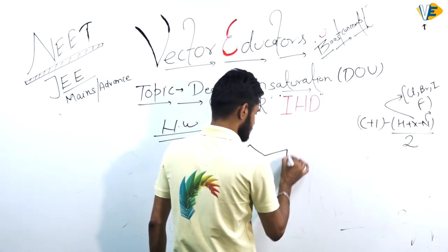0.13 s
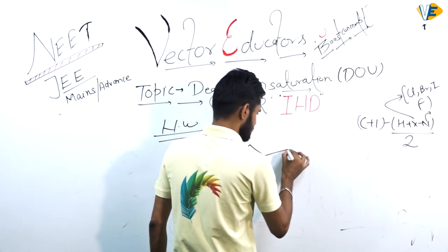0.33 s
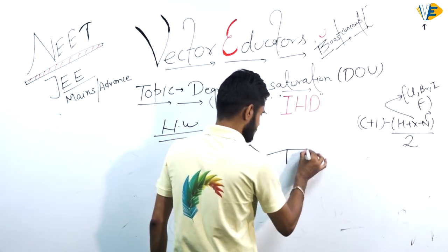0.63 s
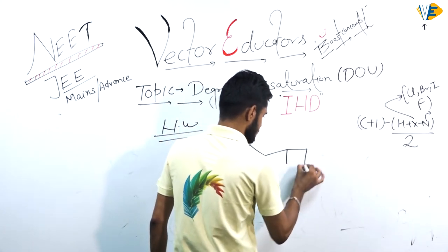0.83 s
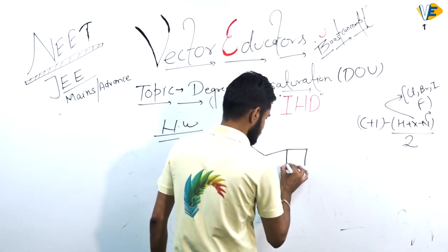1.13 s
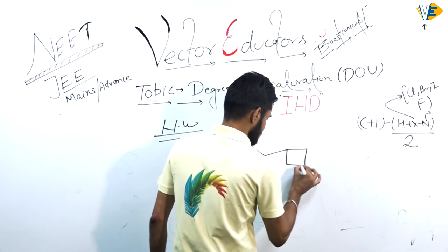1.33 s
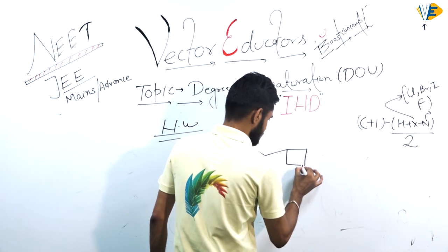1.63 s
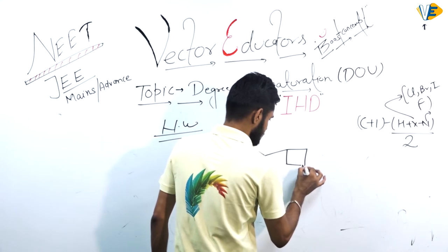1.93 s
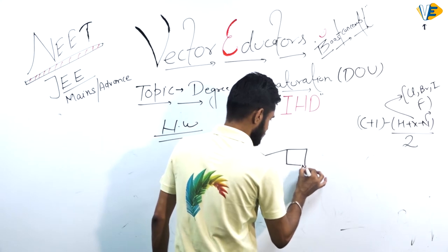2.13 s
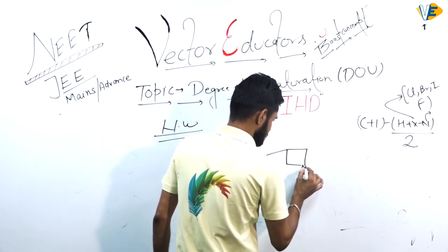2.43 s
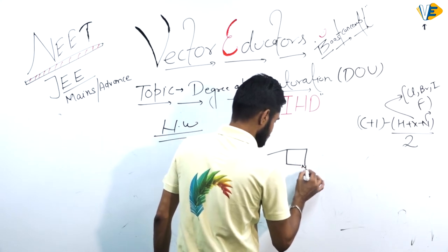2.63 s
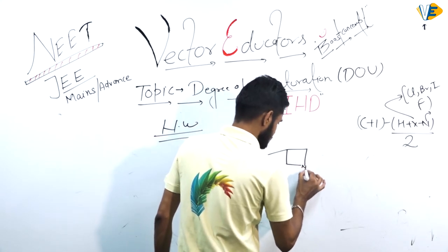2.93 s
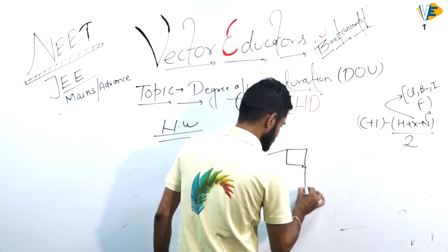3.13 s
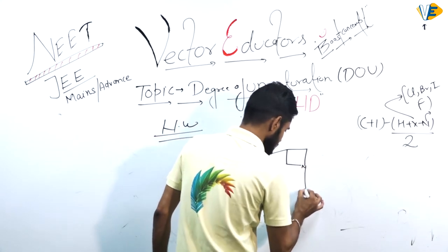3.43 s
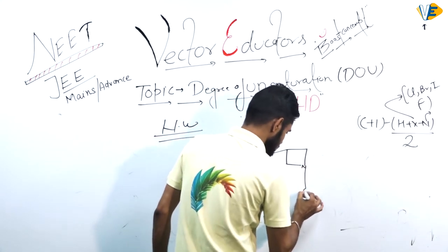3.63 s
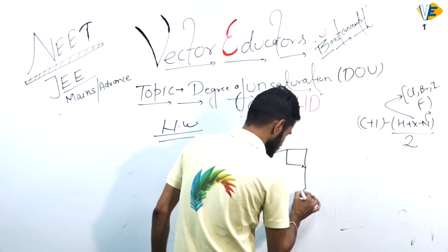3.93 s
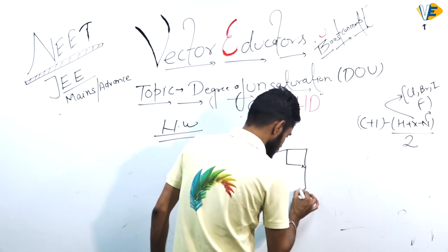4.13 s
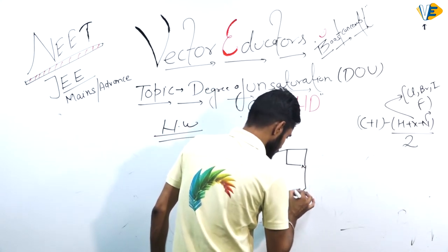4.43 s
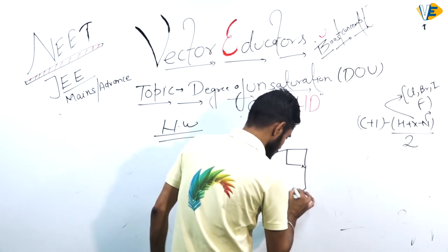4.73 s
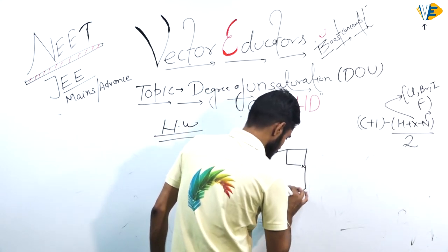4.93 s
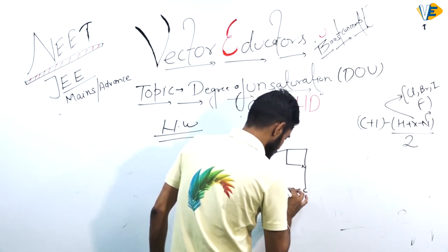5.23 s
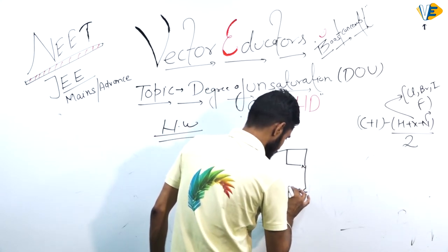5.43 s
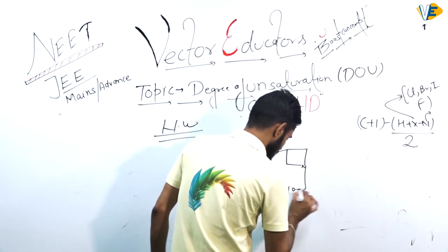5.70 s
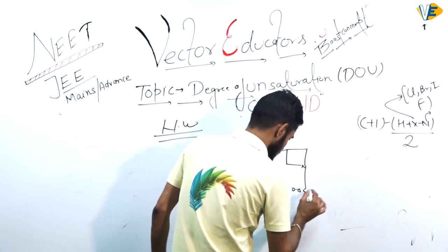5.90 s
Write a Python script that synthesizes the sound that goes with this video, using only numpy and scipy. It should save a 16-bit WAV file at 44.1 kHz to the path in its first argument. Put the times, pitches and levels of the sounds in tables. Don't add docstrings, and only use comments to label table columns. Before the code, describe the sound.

A felt-tip marker draws on a whiteboard in a quiet room. Brief, piercing squeaks, some rising and some falling, turn rough and croaky for an instant. Soft low taps land before many strokes, with thin hiss as the felt slides. Clusters come early, around two seconds, then near three and from four to five and a half, with pauses between. A close small microphone catches short echoes and faint room noise.

```python
import sys
import numpy as np
from scipy import signal
from scipy.fft import rfft, irfft
from scipy.io import wavfile

SR = 44100
rng = np.random.default_rng(int(sys.argv[2]) if len(sys.argv) > 2 else 0)


def waveform_to_disk(signal):
    frames = np.transpose(np.atleast_2d(signal))
    scaled = np.clip(frames, -1, 1) * 32767
    samples = np.round(scaled).astype(np.int16)
    wavfile.write(sys.argv[1], SR, samples)


def invert_db(x):
    u = np.asarray(x, float) / 20
    return 10 ** u


N = 267422

# start t/s, end t/s, build-up time/s, half-rate lines level/dB, their tilt/dB per line
ALTERNATIONS = [(0.03, 0.05, 0.0038, -1.5, 0.5), (0.542, 0.58, 0.0048, -4, -1.5),
                (0.636, 0.654, 0.0027, -9.5, 3.5), (1.322, 1.36, .002, -15, -2.5),
                (1.573, 1.575, 0.0014, -8, -2.5), (1.5853, 1.5928, 0.0024, -4.5, -0.1),
                (1.819, 1.835, 0.0018, -4, -0.16), (2.043, 2.01, 0.0017, -13, 4.5),
                (3.14, 3.152, 0.0033, -3, -2.5), (3.41, 3.445, 0.002, -6, 1.5),
                (3.527, 3.565, 0.008, 4.5, 0.1), (4.26, 4.267, 0.0022, 6.5, 4),
                (4.554, 4.567, 0.0018, -14.5, 1), (4.562, 4.587, 0.0063, -1.5, 1.1),
                (4.665, 4.722, 0.003, 2, 2.75), (5.328, 5.323, 0.0021, -12, 4)]


def on_log(hz, table):
    f, v = np.transpose(table)
    return np.interp(np.log(np.maximum(hz, 1)), np.log(f), v)


def band(x, hz, width_hz):
    return signal.lfilter(*signal.iirpeak(hz, hz / width_hz, fs=SR), x)


def wander(n, rate):
    x = signal.lfilter(*signal.butter(2, rate, fs=SR), rng.standard_normal(n + 6000))
    return x[-n:] / x.std()


def ring(hz, t60, t):
    return np.sin(2 * np.pi * hz * t) * np.exp(-np.log(1000) * t / t60)


def add(out, s, x):
    i = int(round(s * SR))
    out[i:i + len(x)] += x[:N - i]


def alternation(t):
    even_db, settle_s = -43.5, 0.0032
    start, end, build, db, tilt_db = np.transpose(ALTERNATIONS)[..., None]
    on = np.clip(np.minimum((t - start) / build, (end - t) / settle_s) + .5, 0, 1)
    half_db = even_db + (on * (db - even_db)).max(axis=0)
    return on.max(axis=0), half_db, (on * tilt_db).sum(axis=0)


def lowest_db(t):
    # level/dB, level/dB, dealt out one by one to all start
    lowest = [(0.6, 6), (2.4, 1), (-1, 3.3), (-0.5, -2), (0.5, -4.7), (1, -1), (-0.7, 4.5), (0.5, -1.5),
              (-1, 0), (1, -6.5), (-27.5, 7), (-4, -7), (-9.5, 0), (1.5, -18), (-4.5, 6.5), (6, -6)]
    times = np.sort(np.array(ALTERNATIONS)[:, :2].ravel())
    return np.interp(t, times, np.ravel(lowest))


def squeak(rows, tilt_db, first_db, top_db, roll_tilt_db=0, roll_first_db=0, third_db=0, slope_db=0):
    # f/Hz, level/dB
    barrel = [(1500, -1.5), (3000, -6), (4500, -0.5), (6000, 4), (7500, -7), (8700, -5), (9400, -12),
              (10000, -19.5), (11500, -14.5), (13000, -22), (14000, -32), (15500, -44)]
    s, *columns = np.transpose(rows)
    t = np.arange(s[0], s[-1], 1 / SR)
    hz, level_db = (np.interp(t, s, c) for c in columns)
    on, half_db, half_tilt_db = alternation(t)

    along = (t - s[0]) / (s[-1] - s[0]) - .5
    tilt_db = tilt_db + roll_tilt_db * along
    first_db = first_db + roll_first_db * along

    jitter, chatter, slow_hz = .005, .36, 2950
    slowness = np.clip(1 - hz / slow_hz, 0, 1)
    uneven = jitter + chatter * slowness * (.06 + invert_db(np.minimum(half_db, 0)))
    turn = np.pi * np.cumsum(hz * (1 + uneven * wander(len(t), 1500))) / SR

    k = np.arange(1, 12)[:, None]
    line_hz = k * hz / 2
    colour_db = on_log(line_hz, barrel) + k * np.where(k % 2, half_tilt_db, tilt_db)
    size = invert_db(colour_db) * (line_hz < .36 * SR)
    size[0::2] *= invert_db(np.minimum(half_db, 9)) / np.linalg.norm(size[2:7:2], axis=0)
    rate_khz = (hz - hz.mean()) / 1000
    size[5] *= invert_db(third_db + slope_db * 3 * rate_khz)
    size[1::2] /= np.linalg.norm(size[3:8:2], axis=0)

    reference_db, lag, loss_db = -35.5, 0.77, -1.5
    db_per_khz, swell_db, fade_s = 1.5, 2.5, 0.002
    size[1] = invert_db(first_db - lag * (level_db - reference_db) + loss_db * on
                  + db_per_khz * rate_khz + swell_db * wander(len(t), 55))
    size[1] *= np.clip(np.minimum(2 * (t - s[0]), s[-1] - t) / fade_s, 0, 1)
    size[0] *= invert_db(lowest_db(t))
    size[7:] *= invert_db(top_db + .3 * (level_db - level_db.max()))
    size *= invert_db([1.1 * wander(len(t), 45) for _ in k])
    lines = size * np.sin(k * turn + rng.uniform(0, 2 * np.pi, k.shape))

    attack_s, release_s = 0.00036, 0.0011
    edge = np.clip(np.minimum((t - s[0]) / attack_s, (s[-1] - t) / release_s), 0, 1)
    flutter_db = (.2 + 35 * uneven) * wander(len(t), 400)
    return np.sqrt(2) * invert_db(level_db + flutter_db) * edge * lines.sum(axis=0)


def squeaks(pen):
    # t/s, slip rate f/Hz, level/dB
    first_sides = [
        [(0.0, 3330, -27.5), (0.012, 3275, -34), (0.022, 3120, -30.5), (0.0315, 2650, -48), (0.0325, 3070, -40),
         (0.035, 3160, -37.5), (0.039, 2870, -45), (0.042, 2840, -69)],
        [(0.361, 2600, -42), (0.363, 2900, -37.5), (0.368, 3150, -41.5), (0.374, 3320, -55), (0.385, 3365, -58)],
        [(0.526, 3000, -74.5), (0.531, 2996, -43), (0.543, 2820, -44), (0.546, 2960, -40.5), (0.552, 2940, -40),
         (0.557, 2770, -41.5), (0.563, 2400, -57.5)],
        [(0.645, 3290, -29.5), (0.65, 3580, -41), (0.653, 3400, -24), (0.656, 2950, -37), (0.661, 3380, -28),
         (0.669, 3420, -31), (0.68, 3610, -38), (0.708, 3670, -51.5), (0.715, 3640, -72), (0.733, 3660, -82)],
        [(0.778, 3480, -80), (0.785, 3540, -50), (0.788, 3473, -32), (0.815, 3404, -33), (0.824, 3360, -31),
         (0.84, 3180, -35.5), (0.853, 3060, -48.5), (0.857, 3000, -71.5)],
        [(1.142, 2856, -48.5), (1.16, 2834, -43.5), (1.187, 3094, -44), (1.223, 3316, -44), (1.228, 3240, -69)],
        [(1.301, 3120, -43), (1.311, 3014, -35.5), (1.3215, 2587, -45), (1.3228, 3010, -39.5),
         (1.329, 2560, -43), (1.333, 2660, -68)],
    ]
    # t/s, slip rate f/Hz, level/dB
    last_sides = [
        [(1.5745, 2990, -30.5), (1.581, 2820, -27.5), (1.5848, 2500, -32.5), (1.5865, 3404, -30.5),
         (1.5912, 3360, -30), (1.5922, 3126, -29.5), (1.601, 2814, -35.5), (1.608, 3132, -29),
         (1.652, 3213, -58)],
        [(1.82, 3150, -40.5), (1.823, 3260, -32), (1.828, 3386, -31), (1.8345, 3330, -36.5),
         (1.8352, 2860, -30.5), (1.84, 3156, -35.5), (1.86, 3177, -37.5), (1.879, 3287, -41.5),
         (1.898, 3260, -65)],
        [(2.0415, 2750, -33), (2.046, 2954, -31.5), (2.053, 2780, -29.5), (2.0575, 2920, -33),
         (2.061, 3254, -25), (2.07, 3170, -28.5), (2.08, 3276, -30.5), (2.088, 3374, -36.5), (2.097, 3330, -65)],
    ]
    # t/s, slip rate f/Hz, level/dB
    stem = [
        [(2.93, 3150, -29), (2.933, 3390, -40), (2.947, 3706, -30.5), (2.962, 3870, -47), (2.972, 3870, -70)],
        [(3.08, 3580, -52), (3.087, 3324, -42), (3.122, 3210, -37), (3.136, 2976, -32.5), (3.141, 2730, -43.5),
         (3.143, 2886, -40), (3.147, 2930, -42), (3.154, 2550, -48)],
        [(3.4147, 2894, -36), (3.422, 2823, -36.5), (3.4285, 2410, -43)],
        [(3.483, 3300, -45.5), (3.49, 3220, -49), (3.496, 2944, -32.5), (3.503, 2943, -32.5),
         (3.509, 2742, -31), (3.519, 2833, -27.5), (3.535, 3117, -36.5), (3.55, 3050, -44), (3.572, 2987, -63)],
        [(4.189, 3270, -41), (4.192, 3334, -47), (4.206, 3310, -47), (4.222, 3440, -49), (4.245, 3280, -37),
         (4.2585, 2750, -41), (4.2595, 2920, -41), (4.265, 2660, -47), (4.268, 2600, -57)],
    ]
    # t/s, slip rate f/Hz, level/dB
    letters = [
        [(4.55, 3080, -36), (4.553, 3030, -39.5), (4.559, 3120, -38), (4.5685, 2400, -46.5),
         (4.577, 2880, -41.5), (4.581, 3050, -43), (4.585, 3150, -57)],
        [(4.6325, 3280, -40.5), (4.642, 3320, -40), (4.648, 3140, -34.5), (4.657, 2790, -30),
         (4.662, 2740, -33.5), (4.6645, 2660, -32), (4.667, 2530, -38)],
        [(4.667, 3040, -37.5), (4.676, 3020, -35), (4.683, 3127, -35.5), (4.692, 3063, -41.5),
         (4.701, 2970, -37), (4.71, 3000, -39.5), (4.714, 3050, -40), (4.716, 3305, -53), (4.72, 3330, -53)],
        [(5.0647, 2644, -28.5), (5.068, 3380, -31.5), (5.0715, 3417, -30.5), (5.077, 3247, -30),
         (5.082, 3415, -30), (5.086, 3570, -42.5), (5.11, 3495, -54.5), (5.124, 3420, -64)],
        [(5.121, 3430, -47), (5.126, 3404, -41), (5.142, 3305, -43), (5.156, 3280, -80)],
        [(5.32, 2730, -28), (5.326, 3150, -30), (5.341, 2862, -28), (5.355, 2808, -30.5), (5.366, 3074, -35.5),
         (5.385, 3180, -71.5)],
        [(5.5, 2860, -35), (5.503, 3850, -27), (5.5055, 4180, -63), (5.51, 4000, -60)],
    ]
    # stack tilt/dB per line, fundamental level/dB at reference, top lines level/dB
    grips = [(-1.5, -12, 6), (4.5, -13.5, -2), (0, -16.5, -5), (-2, -8, 0), (-4, -9, 7), (5, -15, -29),
             (-0.5, -15, 0.5), (2, -16, -9.5), (0, -17.5, 2), (0, -13, -2), (1, -4.5, 6), (1.5, -6, 0),
             (1, -12.5, -8.5), (2, -10, -3.5), (3, -12, -10), (0, -15, -5.5), (1.5, -10.5, -3.5),
             (1.5, -11, -2.5), (1.9, -4, 1.5), (4.5, -12, -21), (1, -9.5, -1.5), (1.7, -1, 0)]
    # tilt/dB per line, fundamental/dB; third harmonic/dB throughout
    rolls = [(-0.5, -13, -4), (14.5, 8, 4.5), (-2, 1.2, -0.2), (0.3, 4.5, -5), (2, -12.5, -0.8),
             (7.5, 6, 0), (8, -6, 1), (-2, -3, -5), (4.5, 2.5, -0.5), (-6, 10, -5.5), (2.5, 9.5, -3),
             (-0.5, -2, -0.2), (10, 5, -4.5), (-1, -0.5, 1), (-7, -1, 3.3), (2, -11, -2.5), (-3.5, 6, 0.5),
             (4, 18, -4), (4.3, 8.5, -0.6), (.2, -8.5, -0.3), (-0.3, -2.5, 1), (4, 18, -1.2)]
    third_slopes = [-1, 2, .3, -5, 2, 3, 6, -12.5, -5, -12, .3, 3, -7, 11.5, -1.3, -9, 2.3, 4, -0.8, -2,
                    7.5, 1]
    curves = first_sides + last_sides + stem + letters
    for rows, grip, roll, slope_db in zip(curves, grips, rolls, third_slopes):
        add(pen, rows[0][0], squeak(rows, *grip, *roll, slope_db))


def chirp(s, length, first_hz, last_hz, db):
    shape = ((0, -2.5), (0.58, 0), (1, -11))
    return [(s + u * length, first_hz + u * (last_hz - first_hz), db + drop_db) for u, drop_db in shape]


def catches(pen):
    # t/s, length/s, first rate f/Hz, last rate f/Hz, peak level/dB
    brief_catches = [
        (0.3094, 0.0039, 2830, 2770, -44),
        (3.4369, 0.0067, 2770, 3370, -41),
        (4.122, 0.0074, 3220, 3430, -56.5),
        (4.145, 0.011, 3380, 3380, -61),
        (4.722, 0.015, 3210, 3390, -46),
        (5.45, 0.006, 3150, 2440, -42.5),
    ]
    for catch in brief_catches:
        add(pen, catch[0], squeak(chirp(*catch), 0.37, -14.5, -16))


def tap(contact_ms):
    # f/Hz, level/dB, t60/s
    modes = [(172, -.5, 0.026), (300, -15, .03), (600, -10, 0.014)]
    rebound_s = .0013
    u = np.arange(-.005, .005, 1 / SR) / (contact_ms * 0.00033)
    push = np.exp(-u ** 2 / 2)
    t = np.arange(0, .1, 1 / SR)
    board = sum(invert_db(db) * ring(hz, t60, np.maximum(t - rebound_s, 0)) for hz, db, t60 in modes)
    out = np.convolve(board, push / push.sum())
    out[:len(u)] += (np.where(u < 0, 1, .35) * u ** 2 - 1) * push
    out[:len(u)] += 0.13 * ((2 * u) ** 2 - 1) * push ** 4
    return out


def taps(pen):
    # t/s, peak level/dB, contact time/ms
    landings = [(0.3045, -45, 5.3), (1.127, -50, 4.8), (1.5196, -35.5, 3), (1.796, -33.5, 1.97),
                (2.0194, -35.5, 3), (2.852, -40.5, 3.6), (3.3897, -42.5, 4.3), (4.1246, -39.5, 3.8),
                (4.2911, -45, 0.87), (4.549, -37.5, 3.4), (5.0181, -40, 3.8), (5.3048, -29, 2.04)]
    for s, db, contact_ms in landings:
        add(pen, s - .005, invert_db(db) * tap(contact_ms))


def snap(crack_db, hz, ring_db, t60):
    t = np.arange(0, .04, 1 / SR)
    burst = rng.standard_normal(len(t)) * np.exp(-t / .0008)
    crack = band(band(burst, 6500, 10000), 6500, 10000)
    choke = (1 - np.exp(-t / 0.000054)) * np.exp(-(t / (0.75 * t60)) ** 4)
    return invert_db(crack_db) * crack + invert_db(ring_db) * ring(hz, t60, t) * choke


def snaps(pen):
    # t/s, crack level/dB, ring f/Hz, ring level/dB, ring t60/s
    releases = [(0.6451, -25, 1066, -28.5, 0.0015), (1.5742, -25.5, 6500, -31, 0.0027),
                (2.0411, -31.5, 1655, -44, 0.022), (2.932, -39, 6000, -46, 0.0072),
                (3.3562, -68, 827, -48.5, 0.0086), (3.3695, -66.5, 813, -53.5, 0.0079),
                (4.29, -28, 6100, -27, 0.012), (4.2908, -28, 4930, -20.5, 0.016),
                (4.29, -49, 1470, -38.5, 0.021), (4.309, -50, 3330, -45, 0.028),
                (5.066, -36, 5740, -35, 0.013), (5.4998, -36, 3890, -40, 0.013),
                (5.506, -60, 4840, -37.5, 0.022), (5.687, -66, 10600, -69, 0.0026),
                (5.697, -63, 10500, -58.5, 0.0027), (5.704, -62, 10600, -60, 0.003),
                (5.85, -41, 523, -33, 0.0017)]
    for s, *blow in releases:
        add(pen, s, snap(*blow))


def slide(start, end, first_db, last_db, hz, bright_db):
    # f/Hz, width/Hz, level/dB
    bright = [(9400, 5000, 0), (8850, 600, -11), (11700, 800, -15)]
    n = int((end - start) * SR)
    fibres = rng.standard_normal(n) * invert_db(1.2 * wander(n, 60))
    tip = band(band(fibres, hz, 1000), hz, 1000)
    high = sum(invert_db(db) * band(band(fibres, f, w), f, 2 * w) * np.sqrt(SR / w) for f, w, db in bright)
    x = tip / tip.std() + invert_db(bright_db) * high / high.std()
    u = np.linspace(0, 1, n)
    edge = np.clip(np.minimum(u / .08, (1 - u) / .3), 0, 1)
    return x * invert_db(first_db + (last_db - first_db) * u) * edge


def slides(pen):
    # start t/s, end t/s, first level/dB, last level/dB,
    # resonance f/Hz
    drags = [
        (0.379, 0.54, -67, -66, 5700),
        (0.712, 0.795, -72.5, -58, 4850),
        (1.219, 1.308, -70, -63, 5600),
        (2.955, 3.13, -66.5, -61, 4920),
        (2.969, 3.1, -68, -70, 3700),
        (3.44, 3.483, -64.5, -76, 4700),
        (4.295, 4.35, -59.5, -87, 5100),
        (4.58, 4.641, -66.5, -73, 4770),
        (5.503, 5.577, -54, -82, 4500),
        (5.898, 6.096, -82, -70, 1830),
    ]
    # start t/s, end t/s, first level/dB, last level/dB, bright hiss level/dB
    sweeps = [
        (0.017, 0.38, -79, -89, 18.5),
        (1.909, 2.002, -84.5, -81, 12.5),
        (2.078, 2.363, -77, -96.5, 14),
        (4.257, 4.288, -78, -68, 3),
        (4.724, 5.019, -79, -85, 16),
    ]
    for stroke in drags:
        add(pen, stroke[0], slide(*stroke, -8.5))
    for *stroke, bright_db in sweeps:
        add(pen, stroke[0], slide(*stroke, 6000, bright_db))


def room(x):
    # f/Hz, t60/s, level/dB
    decays = [(280, 0.41, -12), (1460, 0.076, -2.5), (3150, 0.21, -9), (4700, 0.085, -27),
              (7000, 0.43, -35)]
    t = np.arange(0, .5, 1 / SR)
    tail = 0
    for hz, t60, db in decays:
        fade = np.exp(-np.log(1000) * t / t60)
        echoes = band(band(rng.standard_normal(len(t)), hz, .7 * hz), hz, .7 * hz)
        tail = tail + invert_db(db) * echoes * fade / np.linalg.norm(fade)
    return signal.fftconvolve(x, tail * np.clip(t / 0.002 - .5, 0, 1))[:N]


def air():
    # f/Hz, level/dB per Hz
    spectrum = [(20, -40.5), (37, -11), (52, -23), (85, -2), (190, -3), (450, -10.5), (870, -16),
                (4000, -25.5), (15600, -29), (15800, -62)]
    noise_db, sway_db = -68, .6
    whine_db, whine_hz, mains_hz, flip = -74, 14400, 50, 8
    x = irfft(rfft(rng.standard_normal(N)) * invert_db(on_log(np.fft.rfftfreq(N, 1 / SR), spectrum)), N)
    noise = x / x.std() * invert_db(noise_db + sway_db * wander(N, 1.7))
    t = np.arange(N) / SR
    whine = np.sin(2 * np.pi * whine_hz * t) * np.tanh(flip * np.sin(np.pi * mains_hz * t))
    return noise + invert_db(whine_db) * whine


def scene():
    pen = np.zeros(N)
    squeaks(pen)
    catches(pen)
    taps(pen)
    snaps(pen)
    slides(pen)
    pen = signal.sosfiltfilt(signal.butter(2, 80, "high", fs=SR, output="sos"), pen, padtype=None)
    pen = signal.sosfilt(signal.ellip(6, .3, 50, 15700, fs=SR, output="sos"), pen)
    return (pen + room(pen) + air())[None]


def low_pass(x):
    return signal.sosfilt(signal.butter(12, 16530, fs=SR, output="sos"), x)


def record(dry):
    return low_pass(dry)


dry = scene()
out = record(dry)
waveform_to_disk(out)
```